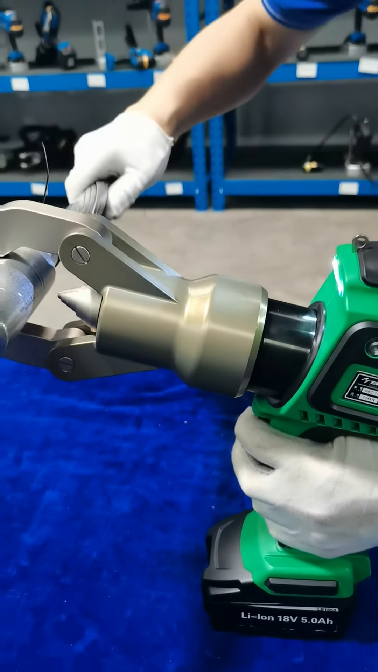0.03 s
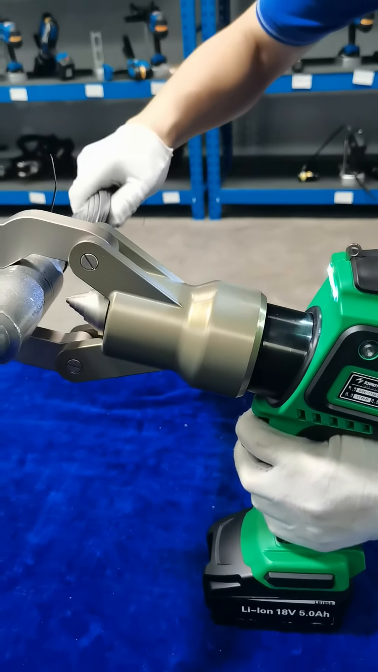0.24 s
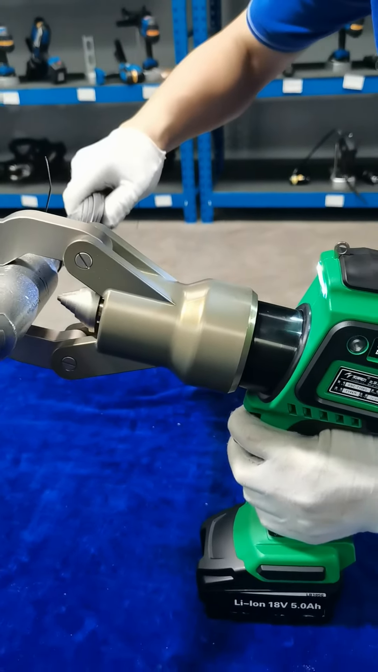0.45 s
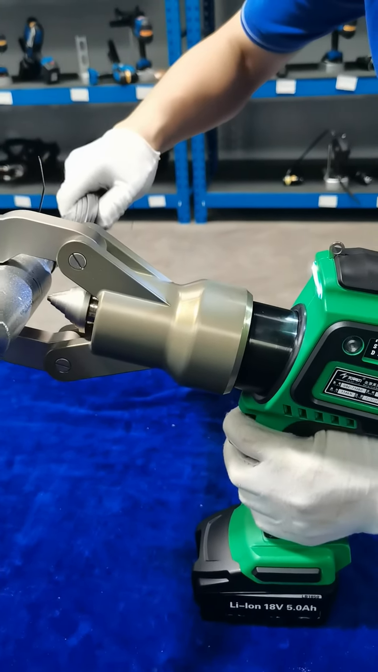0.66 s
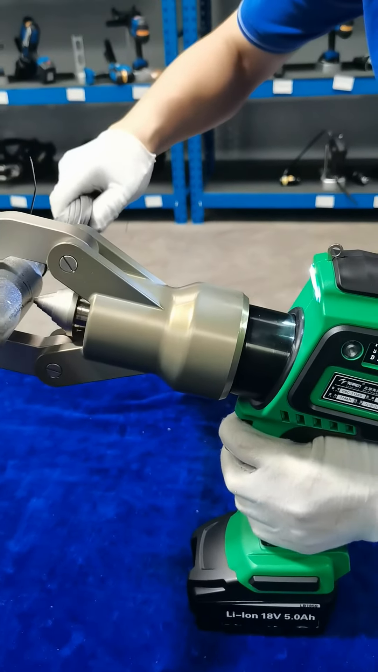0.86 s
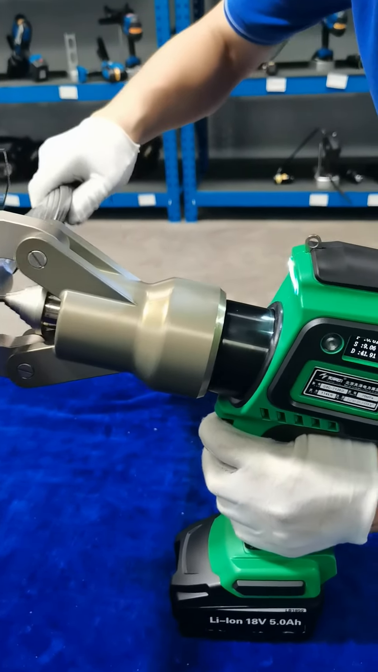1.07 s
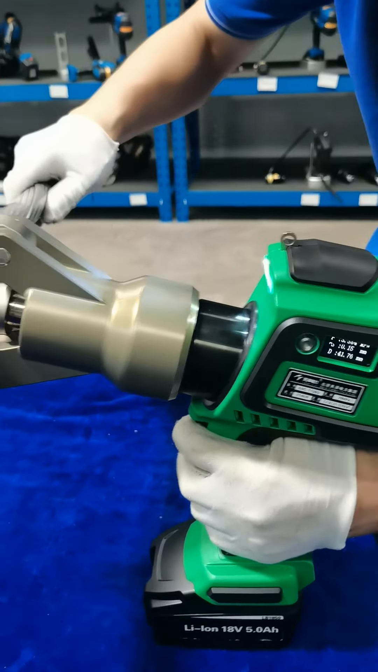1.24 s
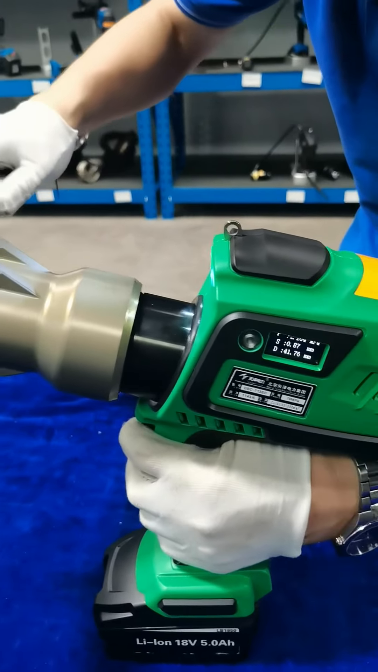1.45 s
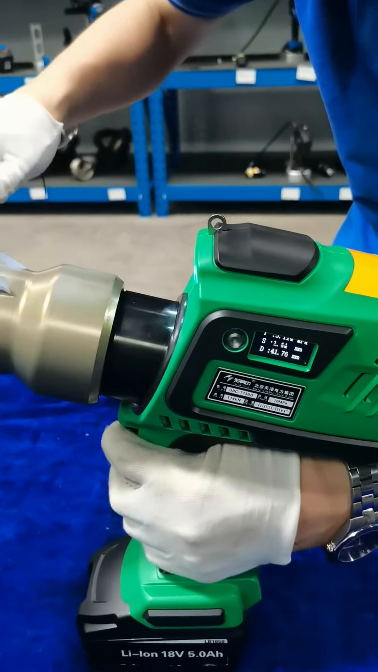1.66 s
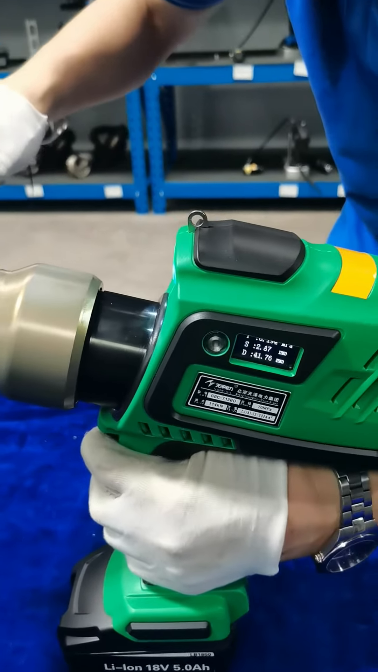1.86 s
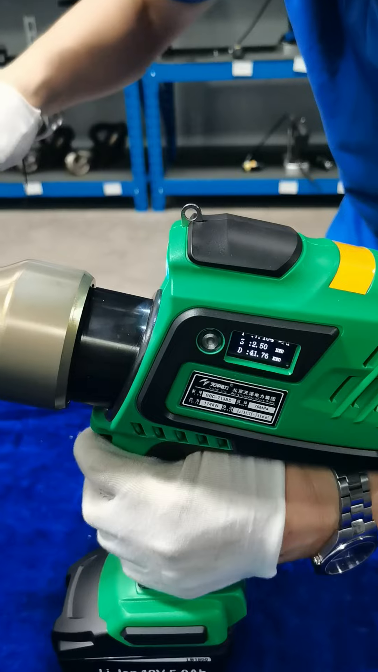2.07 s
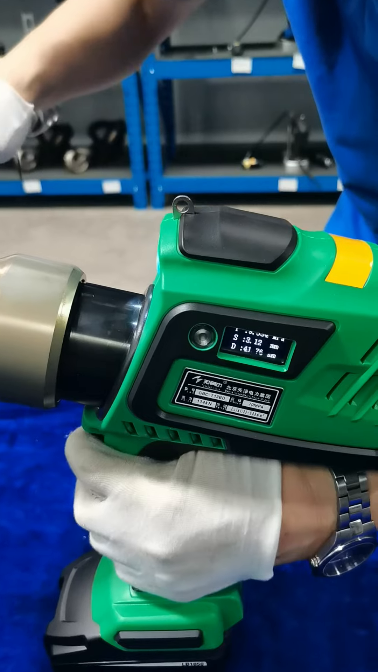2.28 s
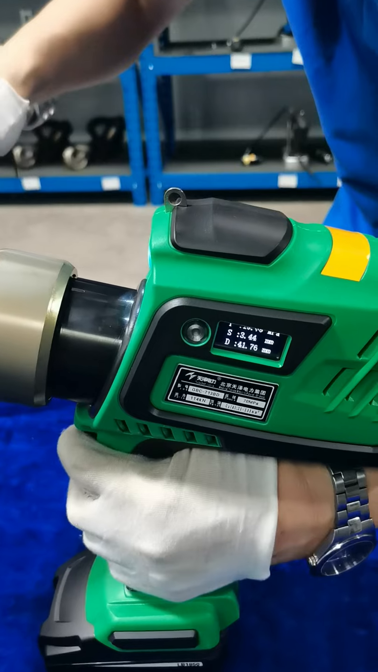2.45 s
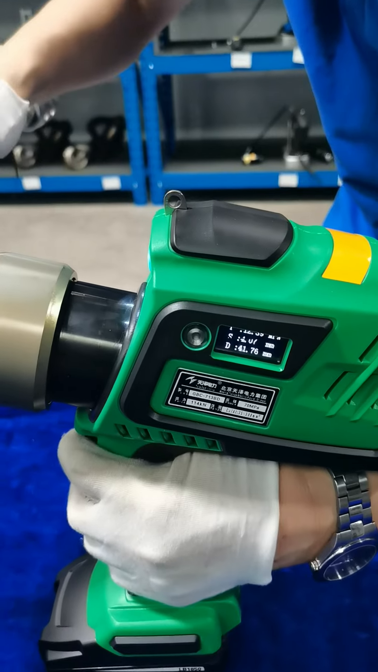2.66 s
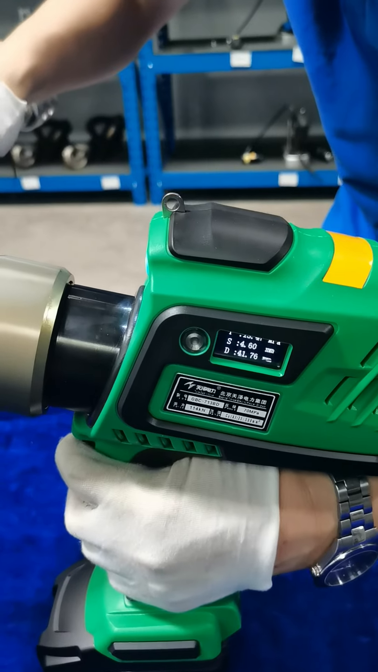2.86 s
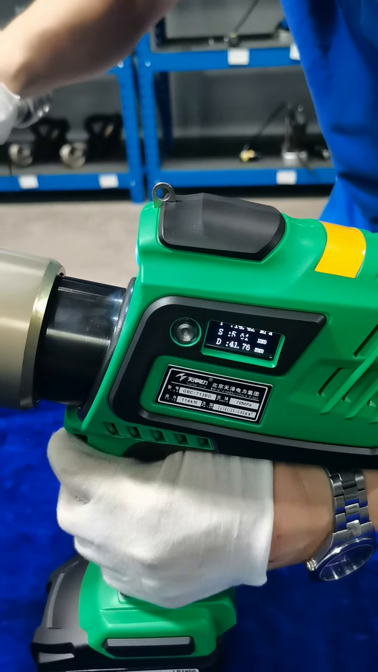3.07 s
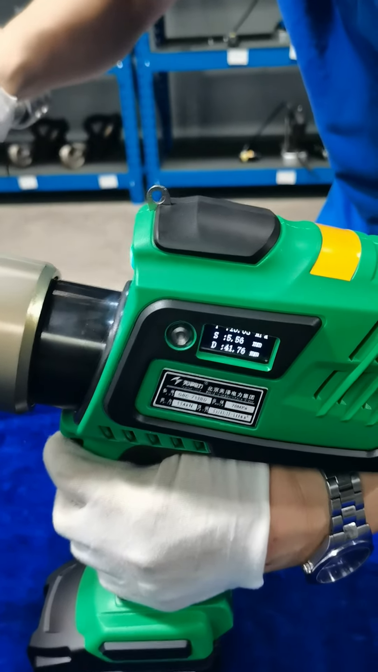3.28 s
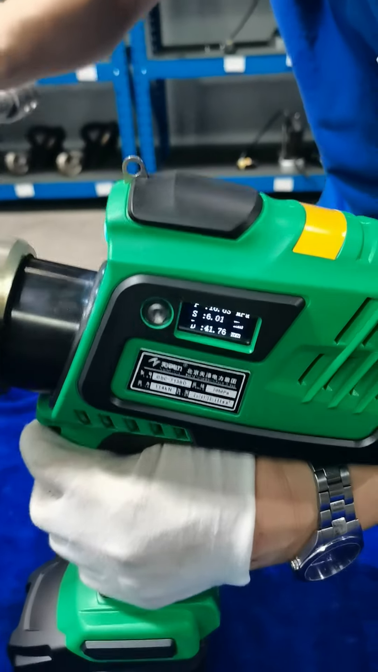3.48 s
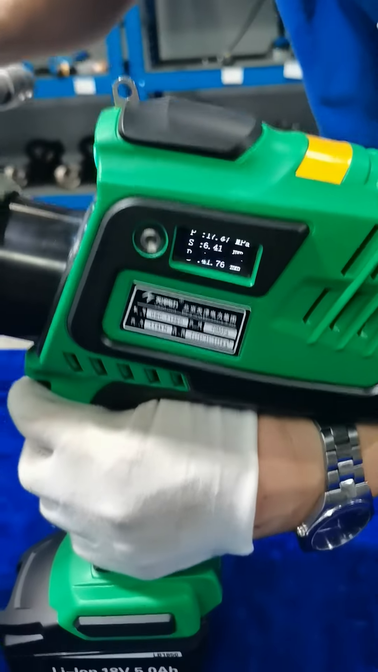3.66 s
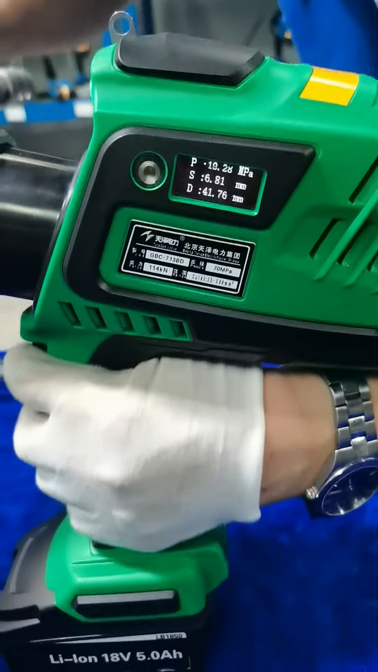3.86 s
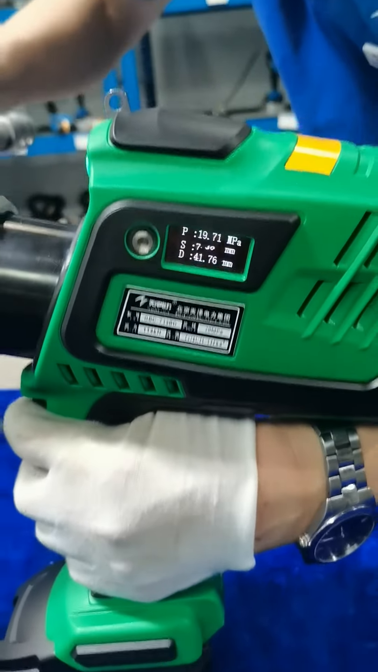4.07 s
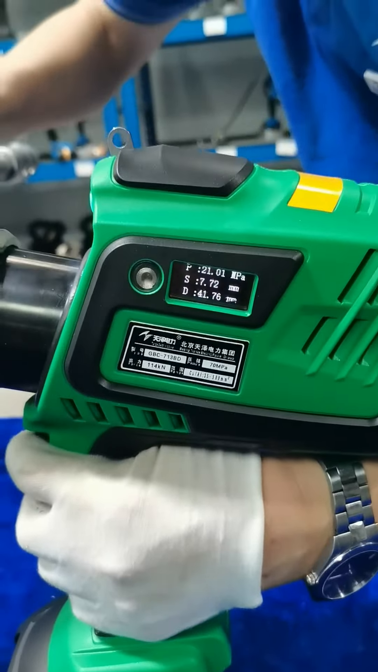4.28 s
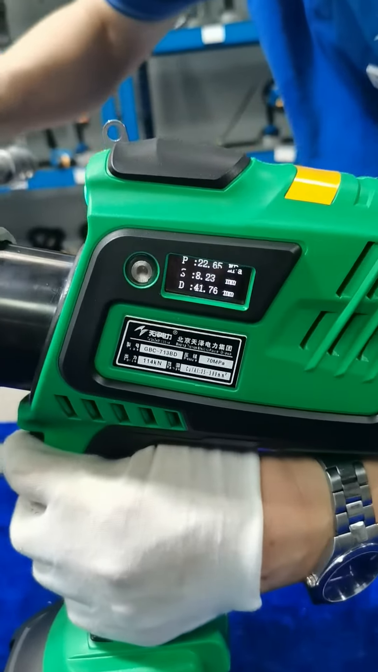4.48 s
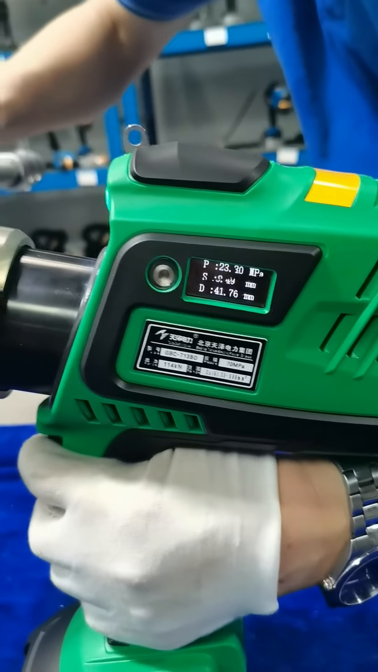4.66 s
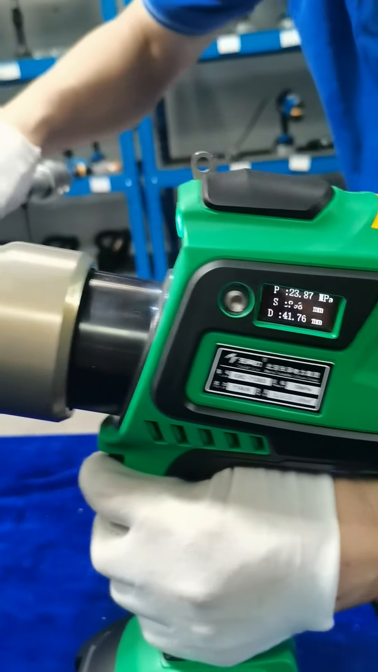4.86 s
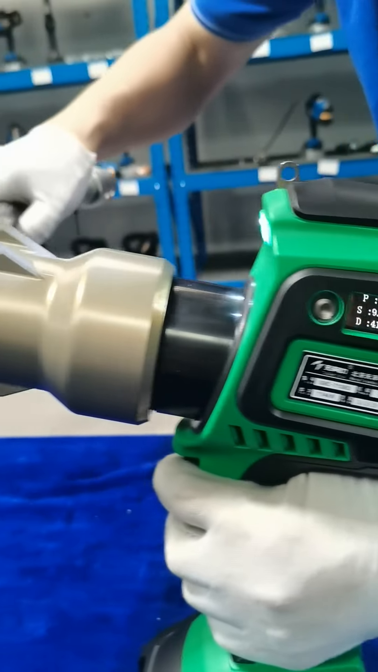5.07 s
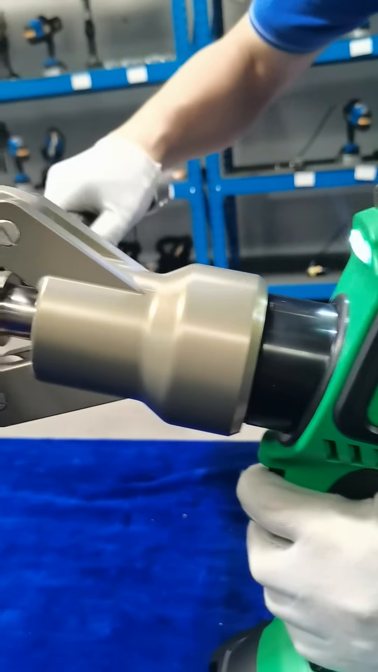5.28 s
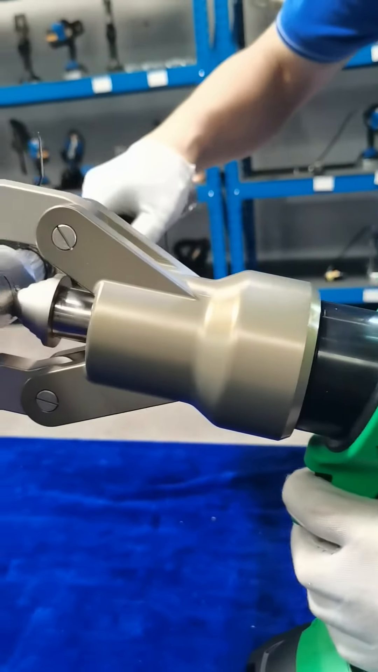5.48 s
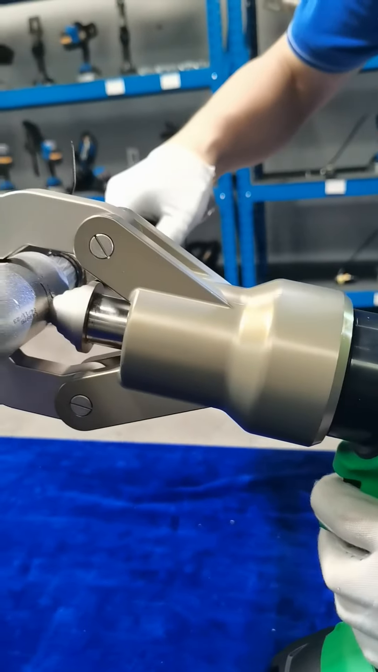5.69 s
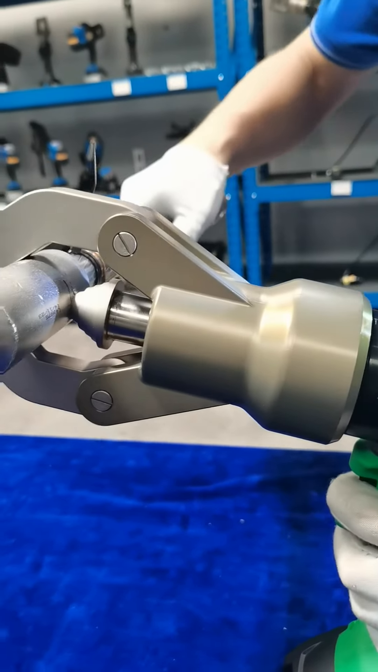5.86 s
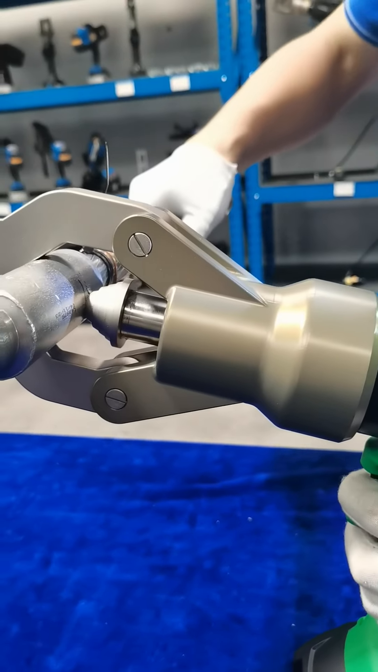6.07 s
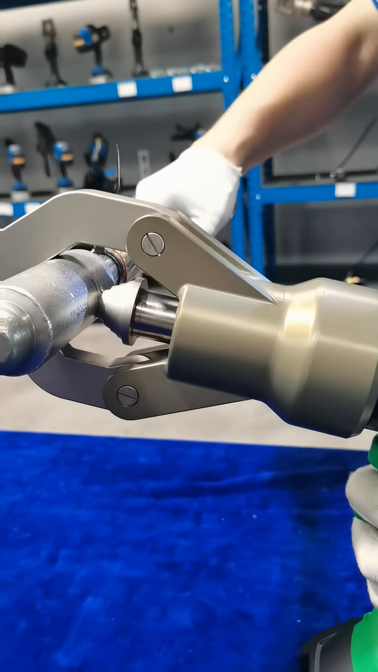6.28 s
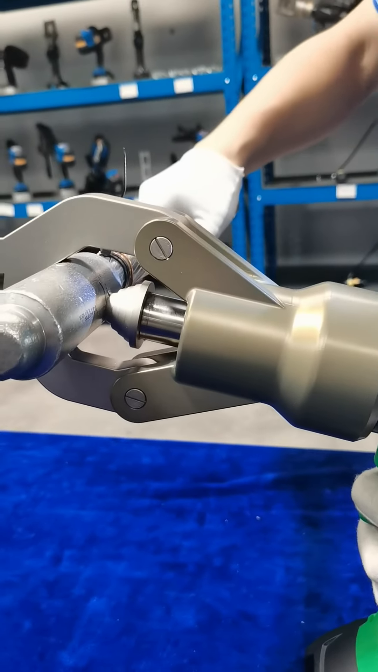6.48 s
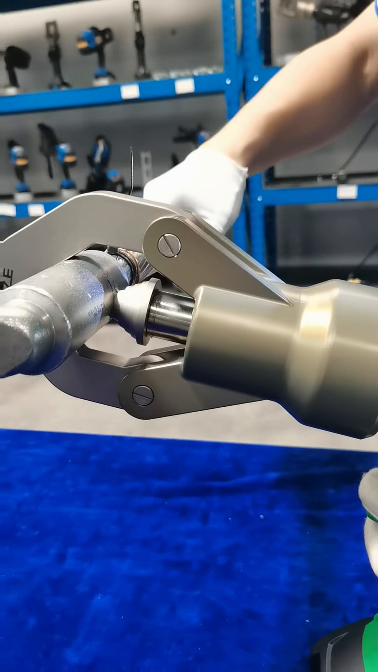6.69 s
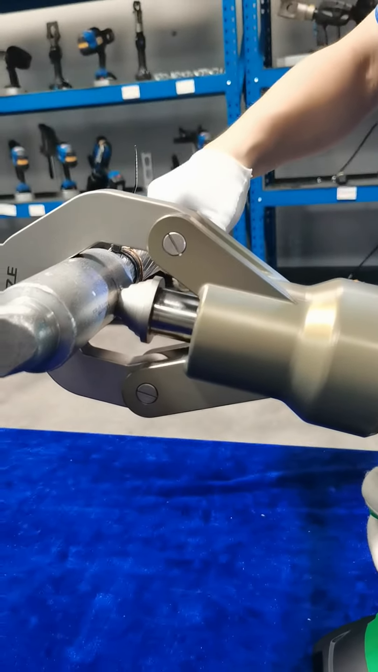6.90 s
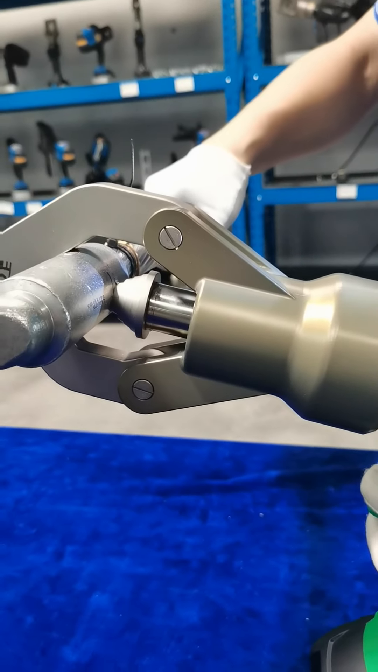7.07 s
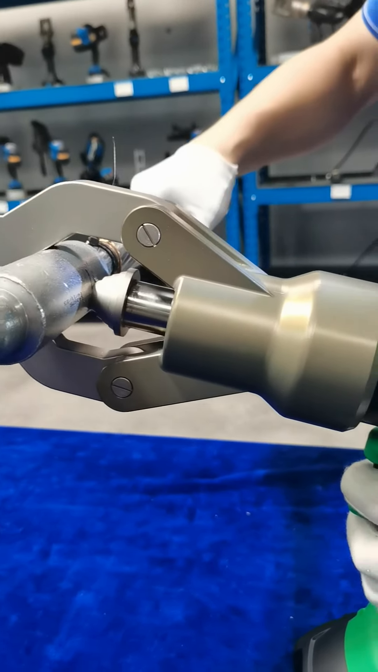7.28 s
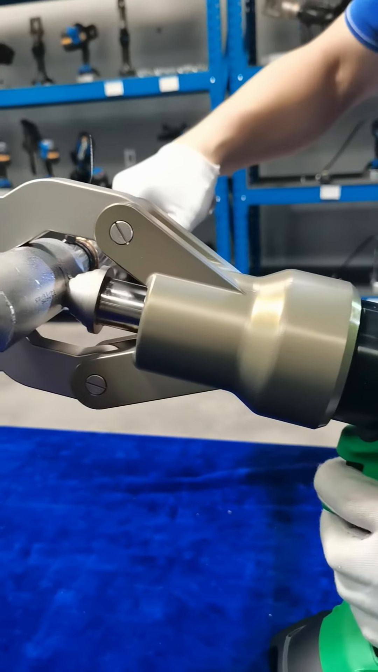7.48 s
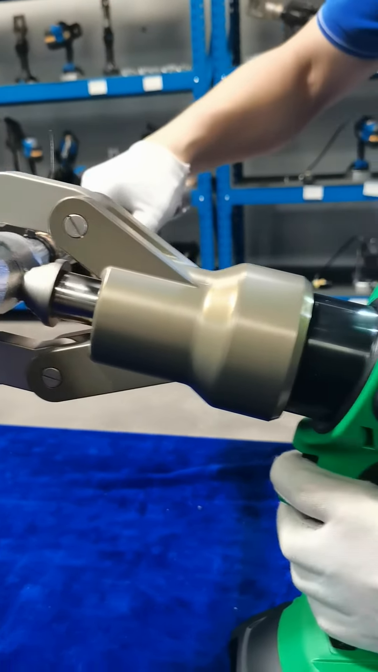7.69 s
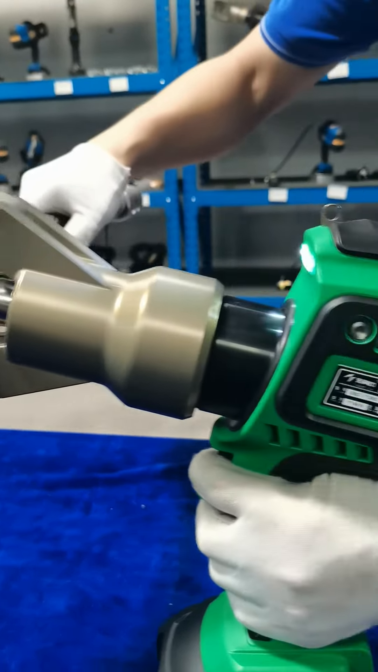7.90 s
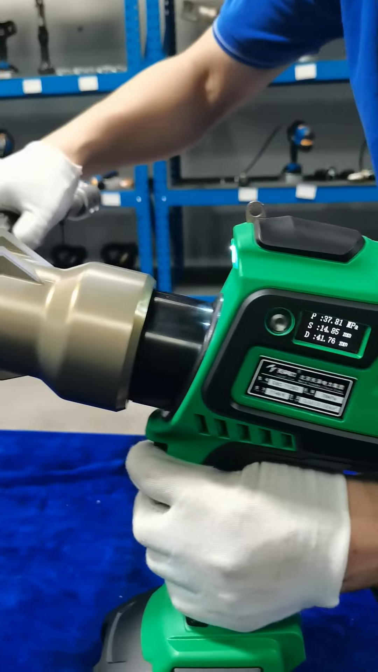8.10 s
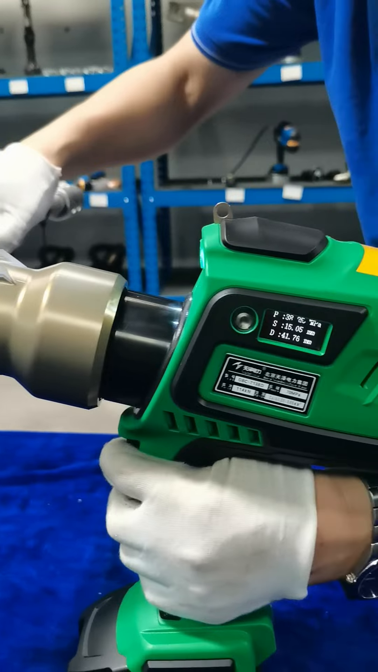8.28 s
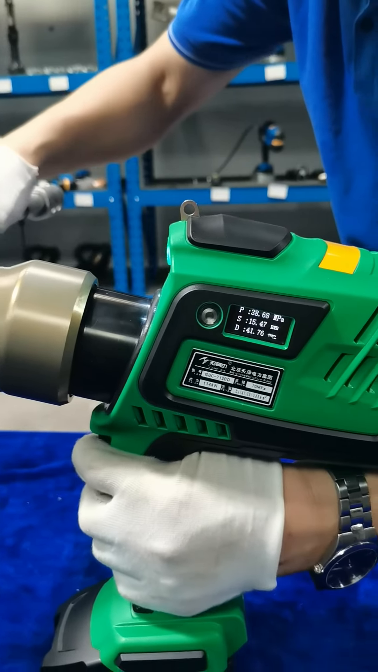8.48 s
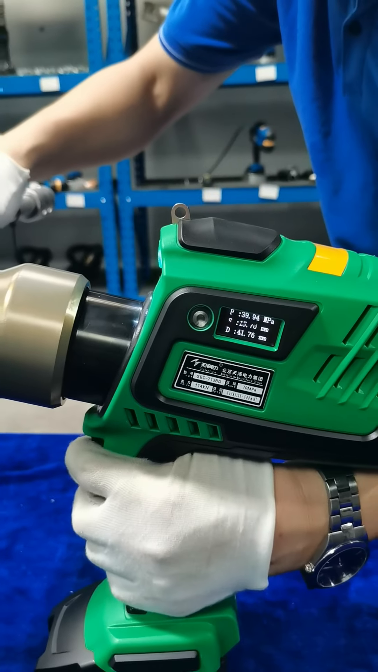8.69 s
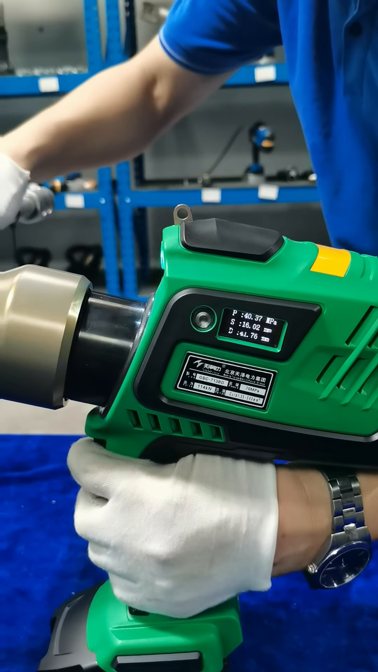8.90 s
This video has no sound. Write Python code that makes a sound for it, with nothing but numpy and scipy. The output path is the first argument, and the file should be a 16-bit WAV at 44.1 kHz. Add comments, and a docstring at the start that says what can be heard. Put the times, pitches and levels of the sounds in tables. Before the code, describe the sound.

A cordless hydraulic crimping tool clicks on and runs with a high, throbbing motor whine and a rapid, rasping pump pulse.

```python
"""A cordless hydraulic crimping tool presses a cable lug, heard from close by in a workshop.
The trigger clicks; the motor kicks in, spins up and drives a piston pump through a gear train.
Every stroke brakes the rotor, more deeply as the oil pressure builds, so the gear whine dips, throbs
and breaks into pips while the loaded gears and the pump rasp. Faint room noise lies underneath."""
import sys
import numpy as np
from scipy import signal
from scipy.fft import rfft, irfft
from scipy.io import wavfile
from scipy.ndimage import uniform_filter1d

SR = 44100
rng = np.random.default_rng(int(sys.argv[2]) if len(sys.argv) > 2 else 0)


def store_pcm(level_fs):
    """Save levels as 16-bit WAV."""
    pcm = np.round(np.clip(level_fs, -1, 1) * 32767).astype(np.int16)
    wavfile.write(sys.argv[1], SR, np.atleast_2d(pcm).T)


N = 394254
TIME = np.arange(N) / SR
SWITCH_ON_S = .266
TEETH = 8  # teeth that mesh in one turn of the rotor


def from_db(db):
    """Decibels to gain."""
    return 10 ** (np.asarray(db) / 20)


def rms_one(x):
    """Scale to unit power."""
    return x / np.sqrt(np.mean(x ** 2) + 1e-20)


def local_rms(x, size):
    """Running level over size samples."""
    return np.sqrt(np.abs(uniform_filter1d(x ** 2, size=size)) + 1e-9)


def curve(points):
    """An envelope through (time, value) breakpoints."""
    return np.interp(TIME, *np.transpose(points))


def drift(rate_hz):
    """Smooth random modulation with unit spread, rolling off above rate_hz."""
    slow = signal.sosfilt(signal.butter(2, rate_hz, fs=SR, output="sos"), rng.standard_normal(N + SR))
    return rms_one(slow[SR:])


def coloured(x, spectrum):
    """Shape a sound with an EQ curve, at unit power."""
    hz, db = np.transpose(spectrum)
    bins = np.maximum(np.arange(N // 2 + 1) * SR / N, 1)
    gain = from_db(np.interp(np.log(bins), np.log(hz), db))
    return rms_one(irfft(rfft(x) * gain, N))


def noise(spectrum):
    """Unit-power noise of the given colour."""
    return coloured(rng.standard_normal(N), spectrum)


def resonate(x, hz, width_hz):
    """One resonance, unity gain at its peak."""
    r = np.exp(-np.pi * width_hz / SR)
    feedback = [1, -2 * r * np.cos(2 * np.pi * hz / SR), r * r]
    return signal.lfilter(np.array([1, 0, -1]) * (1 - r * r) / 2, feedback, x)


def band(x, hz, width_hz):
    """The same resonance twice, for steeper skirts."""
    return resonate(resonate(x, hz, width_hz), hz, width_hz)


def ring_out(x, t60, wet_db):
    """Add a dense, dying tail of reflections or modes."""
    age = TIME[:SR // 2]
    tail = rng.standard_normal(len(age)) * from_db(-60 * age / t60) * (age > .001)
    return x + from_db(wet_db) * signal.fftconvolve(x, tail / np.sqrt(np.sum(tail ** 2)))[:N]


def background(room_db=-59, rumble_db=-58.5, jolt_db=-49):
    """Room tone over a wandering rumble, which swells as the starting torque jerks the tool."""
    # colours of the room tone and the rumble: f/Hz, level/dB
    room_colour = [(25, -13), (55, -2), (80, -5), (120, -5), (160, -4), (205, -5), (280, 1), (450, -32),
                   (680, -30), (790, -6), (950, -29), (3000, -35), (7000, -49), (15000, -43)]
    rumble_colour = [(20, -19), (42, -7), (55, 15.5), (70, 4.5), (100, 1), (135, -1), (200, -35)]
    jolt = from_db(jolt_db) * np.exp(-.5 * ((TIME - .39) / .049) ** 2)
    rumble_gain = from_db(rumble_db + 3.5 * drift(1.6)) + jolt
    return from_db(room_db) * noise(room_colour) + rumble_gain * noise(rumble_colour)


def workshop(x):
    """A few close reflections, then the short, faint tail of the room."""
    # echoes off nearby surfaces: delay/s, level/dB
    reflections = [(.0091, -26.5), (0.0143, -10.5), (0.021, -14.5)]
    early = sum(from_db(db) * np.interp(TIME - delay, TIME, x, left=0) for delay, db in reflections)
    return ring_out(x + early, t60=.35, wet_db=-20)


def trigger(at_s=.089, width_s=.005, level_db=-54):
    """The finger presses the trigger home with a soft click."""
    # colour of the click: f/Hz, level/dB
    colour = [(2000, -30), (4500, -16), (6300, 0), (7500, -1), (8800, -22), (10200, 2), (12000, -14),
              (15000, -12)]
    return from_db(level_db) * noise(colour) * np.exp(-.5 * ((TIME - at_s) / width_s) ** 2)


def kick(rise_s=.0045):
    """The motor's first jolt takes up the slack and knocks the gears together."""
    # modes of the gear train: f/Hz, level/dB, t60/s
    modes = [(1570, -40, .06), (2270, -21, 0.077), (2410, -18, 0.043), (2510, -25, .06), (3500, -35, 0.065),
             (4330, -40, 0.036), (7760, -38, .03)]
    age = np.maximum(TIME - SWITCH_ON_S, 0)
    rings = sum(from_db(db - 60 * age / t60) * np.sin(2 * np.pi * hz * age + .5 * drift(100))
                for hz, db, t60 in modes)
    return rings * (1 - np.exp(-(age / rise_s) ** 2))


def start_buzz(level_db=-31):
    """The heavy starting current makes the motor buzz; the buzz then settles to a lower level."""
    current = np.interp(TIME, [SWITCH_ON_S, .3, .37, .42, .48], [.0013, .69, 1, .43, .32])
    return from_db(level_db) * current * rms_one(band(rng.standard_normal(N), hz=2430, width_hz=350))


def running_gain(speed_share, db, near_weight, speed_power):
    """A friction layer grows with the rotor's speed and as the motor housing comes closer."""
    # closeness of the housing: t/s, level/dB
    nearness = [(.9, -3), (2.2, 0.5), (3.4, 0.1), (4.0, 3), (4.8, 2.5), (5.5, -1), (7.9, 0), (8.6, 1.1)]
    return from_db(db + near_weight * curve(nearness)) * speed_share ** speed_power


def friction(colour, force, angle, swell_db, grain_db, repeat, modes_db):
    """Rubbing that swells with the piston force; the same rough spots come round every rotor turn."""
    surface = rng.standard_normal(126)
    position = angle / (2 * np.pi) * len(surface)
    spots = np.interp(position, np.arange(len(surface)), surface, period=len(surface))
    rub = repeat * spots + rng.standard_normal(N)
    rub *= from_db(grain_db * (drift(600) + .54 * np.sin(angle)))
    rub = ring_out(rub, t60=.026, wet_db=modes_db)  # many small modes of the casing
    return rms_one(coloured(rub, colour) * from_db(swell_db * force + 1.2 * drift(30)))


def hiss(force, angle, speed_share):
    """Grainy friction at the top end surges with every stroke."""
    # colour of the hiss: f/Hz, level/dB
    colour = [(8000, -25), (9300, 0), (9700, 4), (10150, 6.5), (10800, 1.5), (11400, 0.5), (12200, -4),
              (13500, -2), (14200, -29.5), (15000, -34), (15700, -29)]
    rub = friction(colour, force, angle, swell_db=8, grain_db=4, repeat=1, modes_db=2.5)
    return running_gain(speed_share, db=-33.5, near_weight=1, speed_power=.69) * rub


def bearings(force, angle, speed_share):
    """The bearings sizzle, through a higher casing mode while the tool's head is turned forward."""
    # colour of the sizzle: f/Hz, level/dB
    colour = [(6000, -23.5), (6800, -1.5), (7300, 2.5), (7700, 4), (7950, -1.5), (8300, -0.5), (8800, -13),
              (9400, -32), (10000, -81)]
    # blend towards the casing mode: t/s, share
    head_on = [(5.2, 0), (5.9, .6), (7.7, 0.48), (8.2, 0)]
    share = curve(head_on)
    sizzle = friction(colour, force, angle, swell_db=2, grain_db=3, repeat=.98, modes_db=-2)
    casing = rms_one(resonate(sizzle, hz=8150, width_hz=450))
    blend = rms_one((1 - share) * sizzle + share * casing)
    return running_gain(speed_share, db=-32, near_weight=.73, speed_power=1.7) * blend


def rattle(force, angle, speed_share, load):
    """The loose gears make a dull clatter, which eases as the pressure clamps them."""
    # colour of the clatter: f/Hz, level/dB
    colour = [(100, -48), (200, -9.5), (400, -8.5), (560, -7.5), (720, 2), (950, 2.5), (1150, 1), (1500, 6),
              (1800, -3.5), (2400, 4), (2800, -19), (3400, -29), (6000, -13)]
    clamp = from_db(-11.5 * (load - load.mean()))
    clatter = friction(colour, force, angle, swell_db=3, grain_db=1.6, repeat=.15, modes_db=-17)
    return running_gain(speed_share, db=-31, near_weight=-.026, speed_power=1.13) * clamp * clatter


def rasp(force, angle, speed_share):
    """The loaded gears and the pump rub with a bright, pulsing rasp."""
    # colour of the rasp: f/Hz, level/dB
    colour = [(1500, -24), (2700, 3.5), (3080, -2.5), (3350, 4), (3700, -4), (3950, 2), (4250, 2.5),
              (4750, -6.5), (5200, -2.5), (5700, -4), (6300, 0.5), (6800, -6.5), (7500, -33)]
    rub = friction(colour, force, angle, swell_db=6, grain_db=2.5, repeat=1, modes_db=-5.5)
    return running_gain(speed_share, db=-31.5, near_weight=.88, speed_power=.55) * rub


def pump_cycle(first_push_s=.535):
    """The running stroke count, whole at each hardest push and held still until the pump starts."""
    # pump rhythm, slowing as the oil pressure builds: t/s, stroke rate/Hz
    stroke_rate = [(1.0, 16.62), (1.5, 17.21), (2.0, 16.23), (3.3, 16.12), (3.9, 15.76), (5.7, 15.49),
                   (6.8, 15.19), (7.2, 15.34), (7.7, 15.05), (8.6, 14.97), (8.9, 15.68)]
    strokes = np.cumsum(curve(stroke_rate)) / SR
    return np.maximum(strokes - np.interp(first_push_s, TIME, strokes), -.5)


def push(cycle, sharpness, lag=0):
    """The piston's pulse, 0 to 1, once a stroke; lag is in strokes."""
    return np.abs(np.cos(np.pi * (cycle - lag))) ** (2 * sharpness)


def pump_ring(force, swell_db=14):
    """Each push scrapes a metallic ring out of the casing."""
    # envelope of the ring: t/s, level/dB
    levels = [(2.5, -54), (3.8, -38.5), (5.0, -37.5), (6.3, -33), (7.6, -32.5), (8.3, -51)]
    scrape = rng.standard_normal(N) * from_db(swell_db * force)
    return from_db(curve(levels)) * rms_one(band(scrape, hz=3060, width_hz=170))


def chug(cycle, load, level_db=-28, bite_load=.0569):
    """As the jaws bite, each push grinds the gears; more pressure seats the teeth and calms them."""
    bite = np.minimum((load / bite_load) ** 3, np.sqrt(bite_load / load))
    grind = rms_one(band(rng.standard_normal(N), hz=1850, width_hz=900))
    return from_db(level_db) * bite * push(cycle, sharpness=3.9) * grind


def motor(angle, force, speed_share, poles=4, swell_db=6.5):
    """The rotor's unbalance hums once a turn through the body, and its poles ring the motor shell."""
    # envelope of the hum: t/s, relative level/dB
    hum_levels = [(0.5, -37.5), (0.98, -42), (2.34, -32), (2.74, -40.5), (3.62, -34.6), (5.1, -40.5),
                  (5.3, -45.1), (5.58, -39.5), (8.9, -36.5)]
    unbalance = from_db(3.5 * drift(18)) * np.sin(angle + .35 * drift(25))
    hum = from_db(curve(hum_levels) - 4.5 + swell_db * force) * resonate(unbalance, hz=265, width_hz=170)
    pull_db = np.interp(TIME, [.4, 1.5, 4, 8.5], [-33.5, -30, -33, -29.5]) + 3.2 * drift(35)
    pull = speed_share ** 2 * from_db(pull_db) * np.sin(poles * angle + .5 * drift(44))
    return hum + resonate(pull, hz=1302, width_hz=70)


def spin_up(angle, end_s=.64, fade_s=.04, flutter_db=2.5):
    """The bare gear note glides up with the rotor, flaring at each resonance it passes."""
    # gearbox resonances on the way up: f/Hz, width/Hz, level/dB
    flares = [(1364, 220, -21), (1880, 120, -25), (2260, 300, -19)]
    note = np.sin(TEETH * angle + .8 * drift(120)) * np.clip((end_s - TIME) / fade_s, 0, 1)
    note *= from_db(flutter_db * drift(80))
    return sum(from_db(db) * band(note, hz, width) for hz, width, db in flares)


def gears(angle, force, speed_share, load, rough_db=3.5, slack_db=-19.5, direct=.15):
    """Uneven teeth give rotor harmonics that sweep the housing's resonances and scrape under load."""
    # gear tones: multiple of the rotor speed, level/dB
    orders = [(3, -43), (4, -14), (5, -24), (6, -21), (7, -26.5), (8, -4.5), (9, -35), (10, -50), (11, -16),
              (12, -11.5), (13, -26.5), (16, -17), (24, -10.5)]
    # resonances of the housing: f/Hz, width/Hz, level/dB
    housing = [(1317, 23, -11), (1747, 22, -1.5), (2006, 86, 2.5), (2220, 131.7, 7.5), (2950, 90, 5.5),
               (3030, 51, 6.5), (3640, 150, 4.5), (4183, 84, 4.5), (7600, 140, -4)]
    # envelope of the gear tones: t/s, relative level/dB
    levels = [(.5, -18.5), (1.0, -25.5), (1.45, -19), (2.3, -18.5), (3.5, -18.5), (4.1, -23), (4.8, -17.5),
              (5.7, -20), (7.7, -21), (8.6, -16.5)]
    slip = .5 + 2 * load
    mesh = sum(from_db(db + rough_db * drift(126)) * np.sin(order * angle + slip * drift(138))
               for order, db in orders)
    slack = np.clip(load / .084, 0, 1) - force  # the teeth go slack between strokes
    mesh *= from_db(slack_db * slack)
    ring = sum(from_db(db) * resonate(mesh, hz, width) for hz, width, db in housing)
    return from_db(curve(levels)) * speed_share ** .9 * (direct * mesh + ring)


def gearbox_ring(angle, cycle, load, direct=.017):
    """Each time the rotor recovers, the meshing teeth set the gearbox ringing at its own pitch."""
    # sharp modes of the gearbox: f/Hz, width/Hz, level/dB
    modes = [(2628, 40, 0), (2580, 45, -10), (2500, 50, -8)]
    mesh = np.sin(TEETH * angle + .14 * drift(52))
    ring = direct * mesh + sum(from_db(db) * resonate(mesh, hz, width) for hz, width, db in modes)
    ring /= np.sqrt(local_rms(ring, size=200))  # the ringing limits itself, flattening each note
    # under heavy load the sharpest mode takes over and the warble breaks into pips
    pips = np.interp(load, [.092, .23], [0, .94])
    ring = (1 - pips) * ring + pips * resonate(ring, hz=2628, width_hz=150)
    ring /= local_rms(ring, size=200) ** (.3 * pips)  # compress each pip
    ring *= from_db(-32 * np.sqrt(load) * push(cycle, sharpness=5.14))  # the loaded teeth choke it
    # the whine stutters in short random gaps, most between 1.4 and 2 s
    steadiness = np.interp(TIME, [1.2, 1.4, 1.9, 2.2, 3.6, 4.2], [1.7, .1, .1, 1, 1.3, 2.5])
    ring *= uniform_filter1d(.58 + .42 * np.tanh(3 * (drift(45) + steadiness)), size=130)
    return ring / local_rms(ring, size=2800)  # even out the level from stroke to stroke


def whine(angle, cycle, load, free_speed, spread_db=1.85, beep_half_s=.018, ceiling=.6):
    """Near full speed the gearbox sings, no two strokes equally loud, up to a soft ceiling."""
    # envelope of the whine: t/s, relative level/dB
    levels = [(0.5, -10.5), (1.1, -9.5), (1.94, -15), (2.18, -12.5), (2.66, -16), (3.18, -13), (3.58, -18),
              (4.7, -17), (5.78, -24.5), (5.98, -15), (6.14, -24.2), (6.38, -20.5), (6.5, -31.5),
              (6.7, -19.2), (7.1, -29.5), (7.7, -18), (7.9, -22), (8.9, -17.5)]
    # moments when the gearbox catches and sings out: t/s, boost/dB
    beeps = [(2.245, 4.5), (2.37, 3.5), (7.615, 4), (8.08, 6), (8.34, 5.5), (8.545, 2.5)]
    level_db = curve(levels) - 1.22 + spread_db * drift(7.2)
    level_db += sum(db * np.exp(-((TIME - at_s) / beep_half_s) ** 4) for at_s, db in beeps)
    up_to_speed = np.clip((free_speed - 250) / 65, 0, 1) ** 2
    note = from_db(level_db) * up_to_speed * gearbox_ring(angle, cycle, load)
    amplitude = np.sqrt(2) * local_rms(note, size=100)
    return note / (1 + (amplitude / ceiling) ** 6) ** (1 / 6)


def scene():
    """The piston brakes the rotor, and the rotor's angle drives the gear and motor tones."""
    # rotor speed between strokes: t/s, rotation rate/Hz
    free_speeds = [(.27, 3.1), (.32, 93), (.365, 172), (.425, 228), (.47, 270), (.495, 320), (.65, 330.4),
                   (1.2, 330), (2.0, 324.5), (4.0, 326.5), (8.9, 326.3)]
    # load from the oil pressure: t/s, share of its speed that the rotor loses in a stroke
    loads = [(.55, 0.025), (1.2, .05), (1.8, 0.05), (2.6, 0.082), (3.5, .16), (4.6, 0.17), (5.5, .25),
             (6.5, 0.27), (7.5, 0.31), (8.9, 0.31)]
    free_speed, load, cycle = curve(free_speeds), curve(loads), pump_cycle()
    braking = load * push(cycle, sharpness=1.8, lag=-.0705)
    speed = free_speed * (1 - braking) * (1 + .003 * drift(40.1))
    angle = 2 * np.pi * np.cumsum(speed) / SR
    speed_share = np.clip(free_speed / 330, .001, 1)
    force = np.clip(load / .1, 0, 1) * push(cycle, sharpness=.7)  # the throb deepens with the pressure
    tones = gears(angle, force, speed_share, load) + spin_up(angle)
    tones += whine(angle, cycle, load, free_speed) + motor(angle, force, speed_share)
    texture = rattle(force, angle, speed_share, load) + rasp(force, angle, speed_share)
    texture += bearings(force, angle, speed_share) + hiss(force, angle, speed_share)
    strokes = chug(cycle, load) + pump_ring(force)
    switched_on = np.clip((TIME - SWITCH_ON_S) / .0085, 0, 1)
    tool = switched_on * (tones + texture + strokes) + trigger() + kick() + start_buzz()
    return (workshop(tool) + background())[None, :]


def record(dry):
    """A steep low-pass cuts the very top."""
    cutoff_hz = 15700
    return signal.sosfilt(signal.ellip(12, .1, 90, cutoff_hz, fs=SR, output="sos"), dry)


dry = scene()
out = record(dry)
store_pcm(out)
```